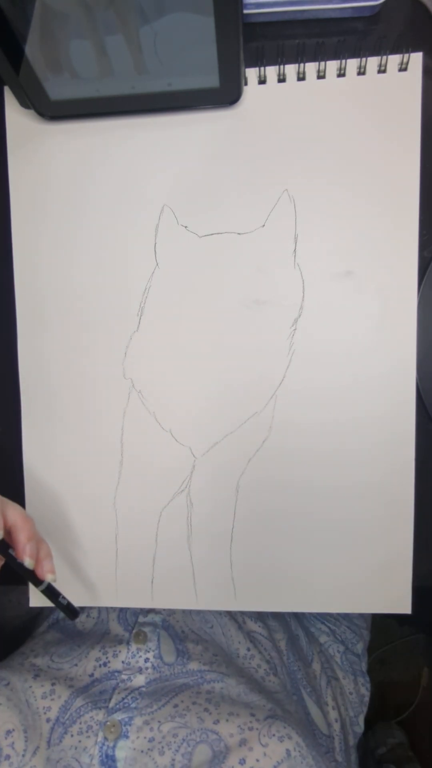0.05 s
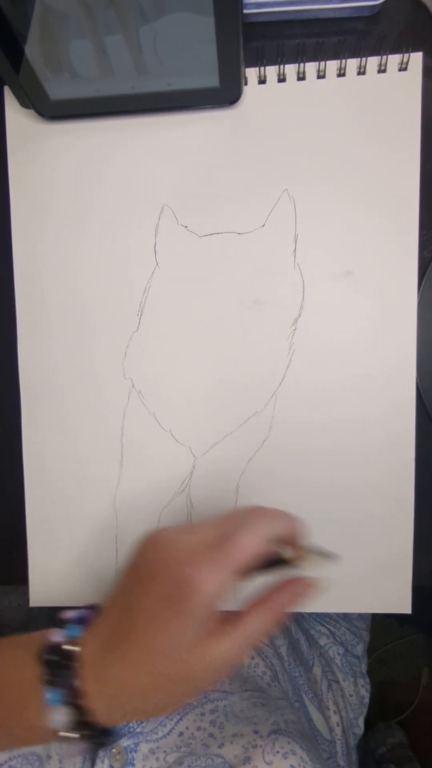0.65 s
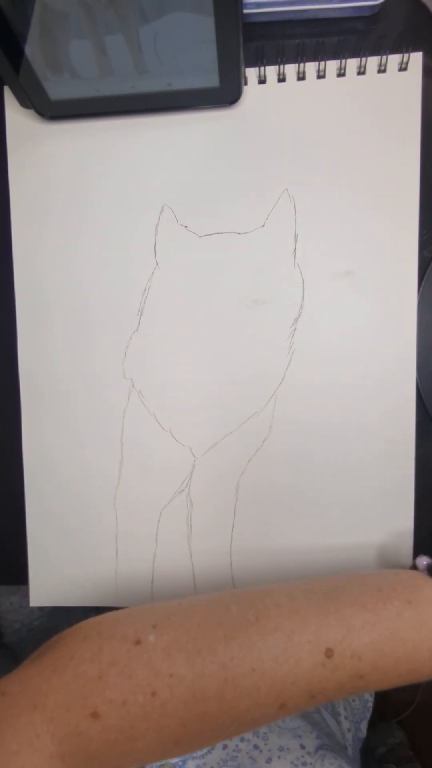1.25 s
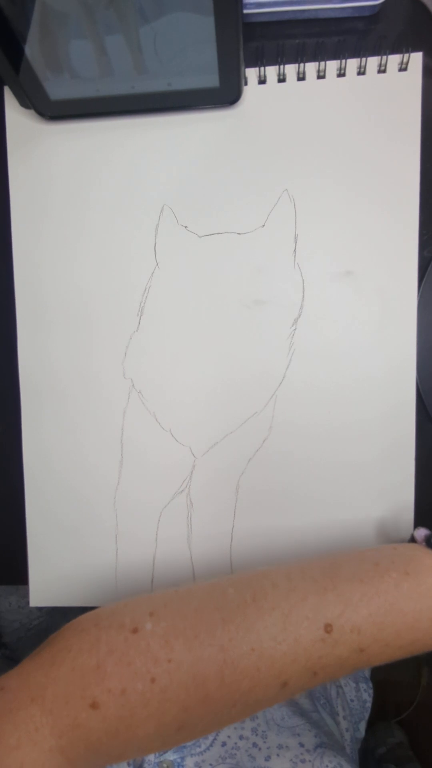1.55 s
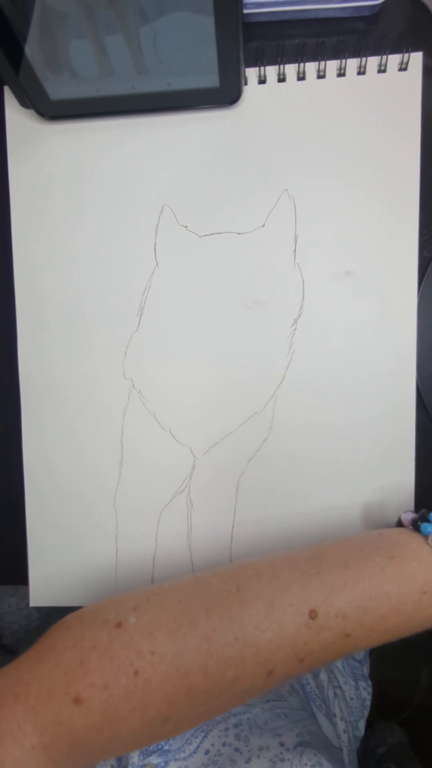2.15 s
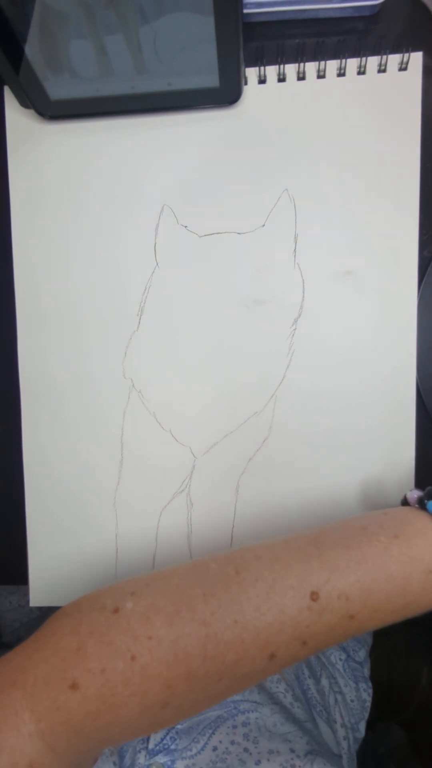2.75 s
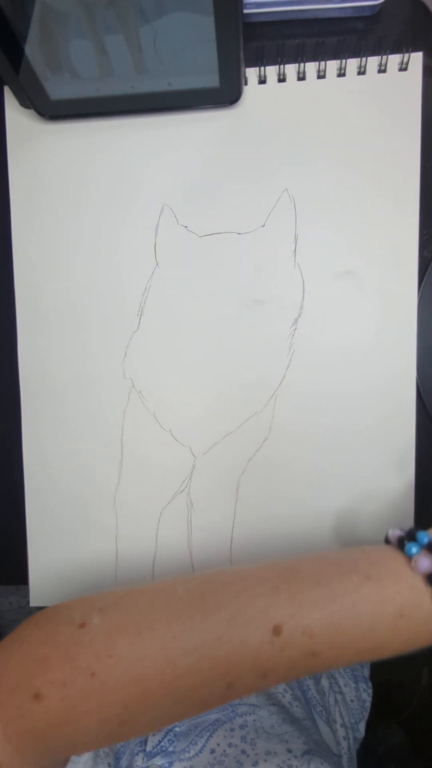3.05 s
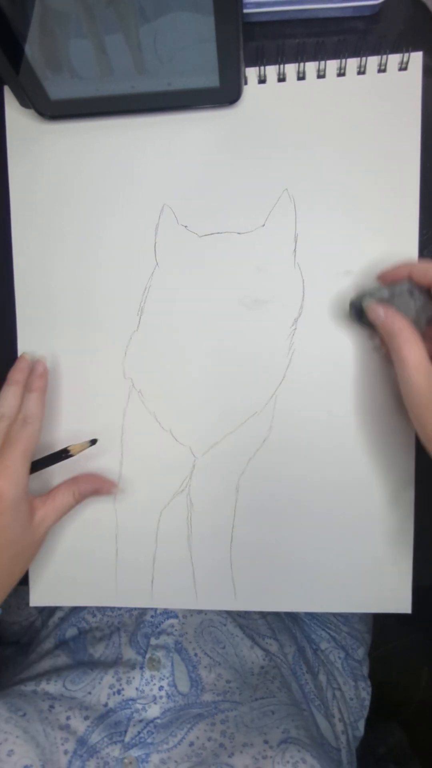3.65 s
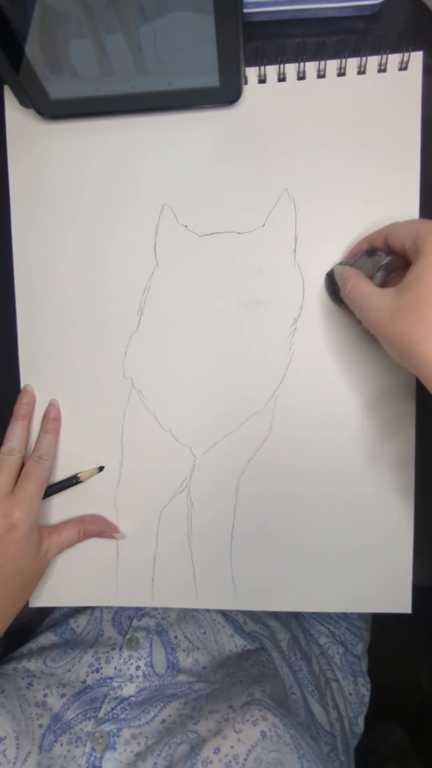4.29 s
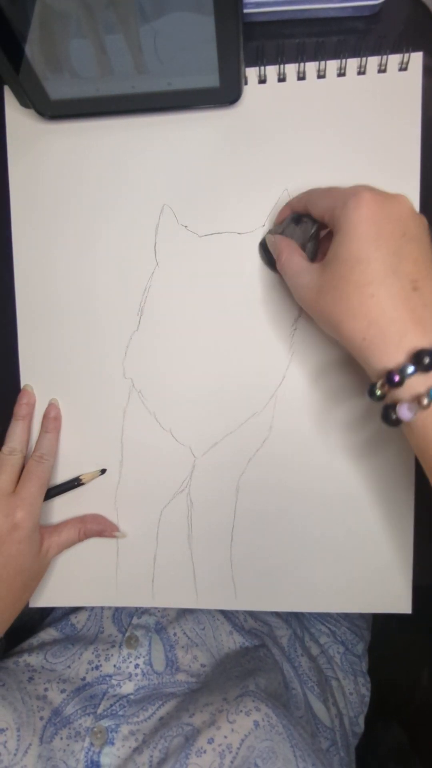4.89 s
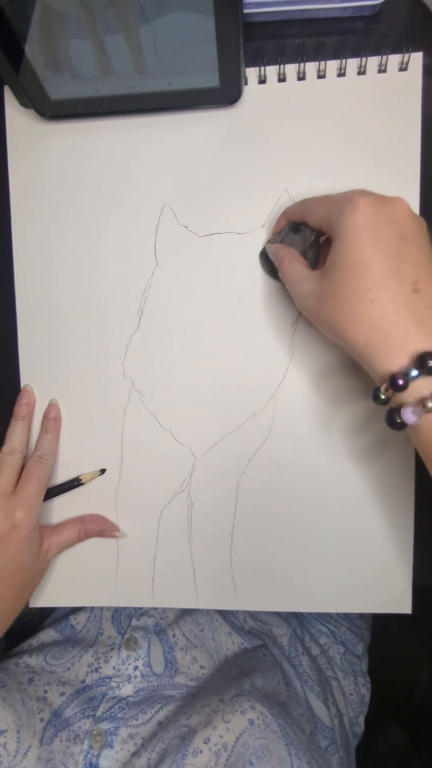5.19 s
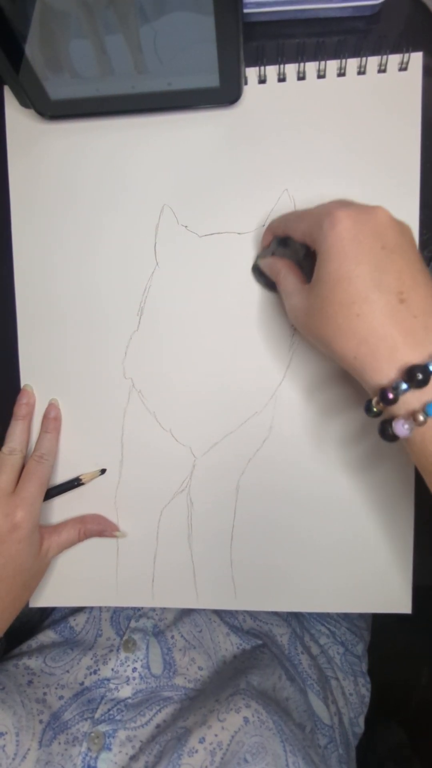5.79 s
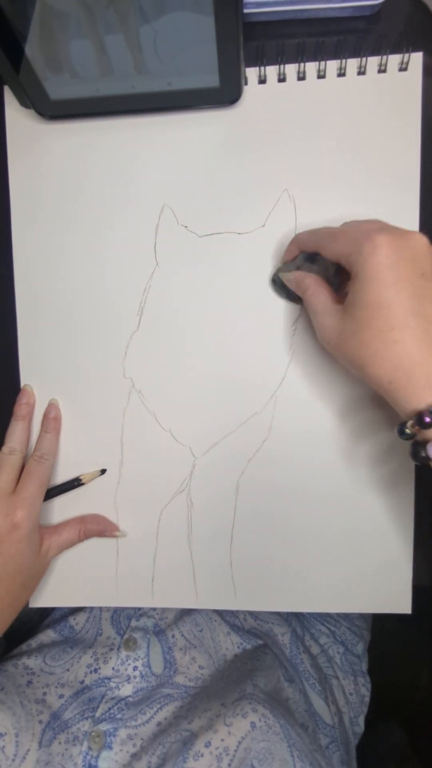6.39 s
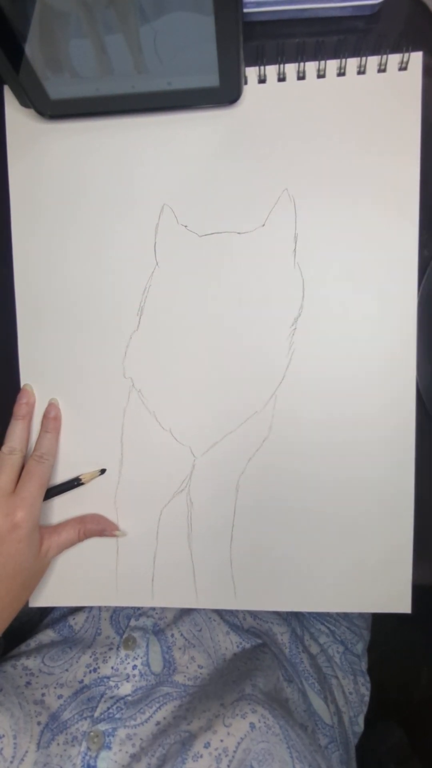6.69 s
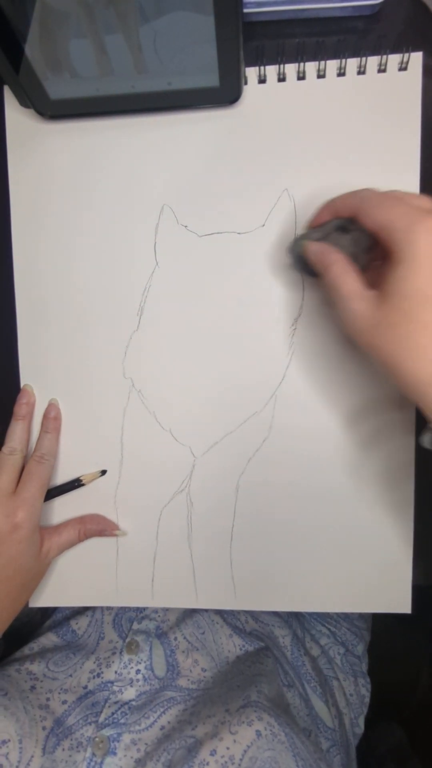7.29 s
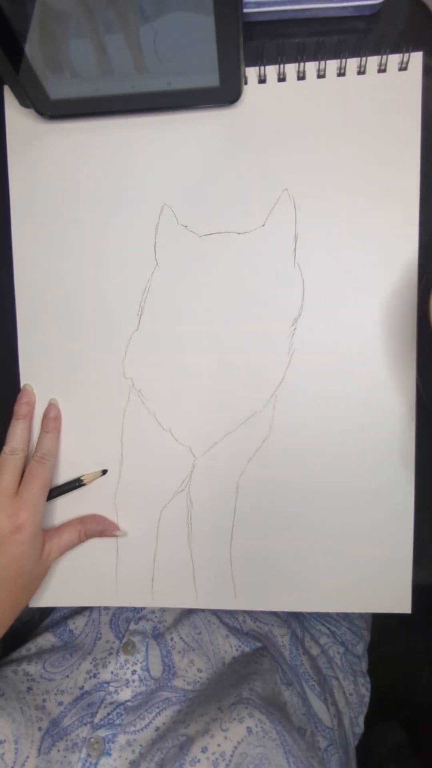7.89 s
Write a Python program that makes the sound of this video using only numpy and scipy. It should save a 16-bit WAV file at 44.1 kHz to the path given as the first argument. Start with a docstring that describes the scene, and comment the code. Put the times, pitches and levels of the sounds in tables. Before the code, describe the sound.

A pencil clatters sharply onto a desk close by. A hand slides and rummages, with scattered light knocks of pencils, a brief hollow rattle of a case and a small hard clink. Then an eraser rubs faintly on a sketch pad, first in separate strokes and then quickly back and forth, with soft pats and low desk bumps. One last stroke follows a pause. The small room is quiet, with a faint fan and hum.

```python
"""Pencil and eraser at a desk

A pencil clatters down, a hand rummages, a case rattles and something hard clinks: each impact excites
damped modes. An eraser then rubs a sketch pad by friction, in light strokes and a quick back-and-forth
run that shakes the desk. A fan, mains hum and a distant rush lie underneath, in a small quiet room."""
import sys
import numpy as np
from scipy import signal
from scipy.fft import rfft, irfft, next_fast_len
from scipy.io import wavfile
from scipy.ndimage import uniform_filter1d

SR = 44100
rng = np.random.default_rng(int(sys.argv[2]) if len(sys.argv) > 2 else 0)


def bounce(signal):
    """Save signal as a 16-bit WAV file at the path given by the first command-line argument."""
    frames = np.transpose(np.atleast_2d(signal))
    limited = np.clip(frames, -1, 1)
    pcm = np.round(limited * 32767).astype(np.int16)
    wavfile.write(sys.argv[1], SR, pcm)


N = 354652
TIME = np.arange(N) / SR
RING_SIZE = 14400   # samples in which an impact dies away


def from_db(db):
    """Amplitude ratio of a level in decibels."""
    return 10 ** (np.asarray(db) / 20)


def unit_rms(x):
    """Normalisation to an rms of 1."""
    return x / np.sqrt(np.mean(x ** 2) + 1e-20)


def at_hz(points, hz):
    """Interpolation on a logarithmic frequency axis."""
    f, value = np.transpose(points)
    return np.interp(np.log(hz + 1), np.log(f), value)


def add(out, s, sound):
    """Superposition of a sound from time s on."""
    start = max(round(s * SR), 0)
    out[..., start:start + sound.shape[-1]] += sound[..., :N - start]


def panned(x, pan_db):
    """Interaural level difference: the left exceeds the right by pan_db."""
    return x * from_db(np.array([[.5], [-.5]]) * pan_db)


def drift(rate):
    """Random modulation: Gaussian values, rate of them a second, joined by straight lines."""
    return np.interp(TIME * rate, np.arange(4096), rng.standard_normal(4096))


# likeness of the sound at the two ears: f/Hz, correlation
COHERENCE = [(60, 0.94), (200, 1), (380, 0.86), (700, .5), (1300, .05), (3000, -.05), (15000, 0)]
def coloured(source, spectrum, resonances=()):
    """Spectral shaping of two white signals into stereo of rms 1, coherent at long wavelengths."""
    size = next_fast_len(source.shape[-1])
    hz = np.arange(size // 2 + 1) * SR / size
    peaks_db = sum(db / (1 + ((hz - f) / width) ** 2) for f, width, db in resonances)
    mid, side = rfft(source, size) * from_db(at_hz(spectrum, hz) + peaks_db) * (hz > 20)
    alike = np.clip(at_hz(COHERENCE, hz), -1, 1)
    both = np.sqrt(1 + alike) * mid + np.sqrt(1 - alike) * side * [[1], [-1]]
    return unit_rms(irfft(both, size)[:, :source.shape[-1]])


def noise(spectrum, resonances=(), size=N):
    """Gaussian stereo noise with a given spectral envelope."""
    return coloured(rng.standard_normal((2, size)), spectrum, resonances)


def slips(per_s, spread_db):
    """Friction as shot noise: tiny random slips of uneven size, per_s of them a second."""
    sizes = from_db(spread_db * np.minimum(rng.exponential(1, N), 4))
    return unit_rms((rng.random(N) < per_s / SR) * sizes * rng.standard_normal((2, N)))


def impact(spectrum, t60, room_db, room_t60):
    """Overlapping damped modes act as decaying noise; the room's reverberation adds in power."""
    t = TIME[:RING_SIZE]
    direct = from_db(-60 * t / t60) * (1 - np.exp(-t / 0.0005))
    room = from_db(room_db - 60 * t / room_t60) * (1 - np.exp(-t / 0.0038))
    return noise(spectrum, size=RING_SIZE) * np.hypot(direct, room)


def ring(modes, uneven_db):
    """Free vibration: damped sinusoids of random strength, the high ones out of phase between the ears."""
    hz, db, t60 = np.transpose(modes)[..., None]
    t = TIME[:RING_SIZE]
    strength = from_db(db + uneven_db * rng.standard_normal(hz.shape)) * rng.choice([-1, 1], hz.shape)
    lead = np.arccos(np.clip(at_hz(COHERENCE, hz), -1, 1)) / 2 * rng.choice([-1, 1], hz.shape)
    fading = strength * np.exp(-np.log(1000) * t / t60)
    return np.array([np.sum(fading * np.sin(2 * np.pi * hz * t + ear * lead), axis=0) for ear in (1, -1)])


# spectrum of the fan: f/Hz, level/dB
FAN_SPECTRUM = [(40, -4), (140, 11), (200, 1.5), (290, -1.5), (390, -0.5), (560, -3.5), (700, -8.5),
                (1050, -11.5), (2100, -15.5), (4000, -25), (6300, -26), (8400, -25.5), (9800, -34),
                (12000, -30.5), (16000, -43.5)]
# its peaks and dips: f/Hz, half width/Hz, level/dB
FAN_PEAKS = [(1331.6, 89, 16), (1540, 25, -9), (1838, 90, 18), (2080, 140, -6)]
def fan():
    """Steady broadband noise, coloured by two airy resonances."""
    return from_db(-69) * noise(FAN_SPECTRUM, FAN_PEAKS)


# harmonics of the mains: f/Hz, level/dB
HUM_HARMONICS = [(60, -76.5), (120, -64)]
def mains_hum():
    """A fundamental and its octave, each with slight random phase modulation."""
    return sum(from_db(db) * np.sqrt(2) * np.sin(2 * np.pi * hz * TIME + 0.067 * drift(10))
               for hz, db in HUM_HARMONICS)


# spectrum of the distant rush: f/Hz, level/dB
RUSH_SPECTRUM = [(120, -8.5), (260, -4), (390, 0.5), (600, -2.5), (1000, -4.5), (1800, -9.5), (3000, -13.5),
                 (4500, -17.5), (8000, -24), (11000, -36), (16000, -50.5)]
# its peaks and dips: f/Hz, half width/Hz, level/dB
RUSH_PEAKS = [(393, 28, 9), (585, 15, 6.5), (3200, 430, 2), (4350, 110, -5), (4900, 140, 4),
              (5750, 150, -4), (6400, 250, 4)]
def distant_rush():
    """Soft resonant noise whose level sinks slowly, then drops away near the end."""
    sag_db_per_s, stop_s, fade_s = 0.29, 6.548, 0.29
    stopped = np.clip((TIME - stop_s) / fade_s, 0, 1)
    level_db = -68 - sag_db_per_s * TIME - 13 * stopped
    return noise(RUSH_SPECTRUM, RUSH_PEAKS) * from_db(level_db + .6 * drift(18))


# low resonance of the desk: f/Hz, level/dB
DESK_SPECTRUM = [(20, -49.5), (30, -26.5), (39, -12.5), (52, -1.5), (66, 1.5), (90, -11.5), (130, -12),
                 (200, -27), (400, -43), (1000, -65)]
def desk_rumble():
    """Faint, continuous random vibration around the desk's low resonance."""
    return noise(DESK_SPECTRUM) * from_db(-65.5 + 1.5 * drift(2.3))


def swell(s, db, rise_s, fall_s):
    """Envelope of one sweep: exponential growth up to time s, then exponential decay."""
    below_peak_db = 20 * np.maximum((s - TIME) / rise_s, (TIME - s) / fall_s).clip(max=10)
    return from_db(db - below_peak_db)


# sweeps of the hand: peak t/s, level/dB, 20 dB rise/s, 20 dB fall/s (a negative pair swaps roles)
HAND_SLIDES = [(.02, -66, -1, -0.4), (.39, -57, 0.18, 0.33), (.75, -67, 0.4, .26), (1.25, -66, 0.05, 0.7),
               (1.63, -56.5, 0.4, 0.2), (2.21, -61.5, .12, 0.22), (2.83, -50.5, .17, 0.24),
               (3.525, -56.5, 0.08, 0.16)]
# spectrum of sliding on the desk: f/Hz, level/dB
SWISH_SPECTRUM = [(150, -11), (400, 2.5), (1200, 4), (2500, -0.5), (4500, -8.5), (8500, -15.5),
                  (15000, -26)]
def sliding_hand():
    """Sliding friction of skin and pencils on the desk: a grainy swish, a faint rustle between sweeps."""
    fidget_end_s = 3.6
    fidget = from_db(-81.5) * np.clip((fidget_end_s - TIME) / 0.18, 0, 1)
    motion = np.max([fidget] + [swell(*slide) for slide in HAND_SLIDES], axis=0)
    swish = coloured(slips(5400, spread_db=2.5), SWISH_SPECTRUM)
    return swish * motion * from_db(2.8 * drift(70))


# hollow body of a knock: f/Hz, level/dB
BODY_SPECTRUM = [(60, -23.5), (125, -4.5), (170, -19.5), (230, -26), (290, -7), (380, -8.5), (520, -3.5),
                 (800, -3), (1100, -7.5), (1600, -19.5), (3000, -50.5)]
# modes of the desk top: f/Hz, level/dB, T60/s
DESK_TOP_MODES = [(291, 2, 0.092), (426, -6, 0.24), (535, -1, 0.48), (635, -0.5, 0.23), (761, -2, 0.083),
                  (770, -3.5, 0.083), (964, -1.5, 0.37), (1170, -7.5, 0.036)]
# wooden clack: f/Hz, level/dB
CLACK_SPECTRUM = [(500, -35.5), (1100, -7), (1600, 1), (2000, -3.5), (2500, -0.5), (3050, -3.5),
                  (3700, -6.5), (4600, -15), (7000, -43)]
# bright snap of contact: f/Hz, level/dB
SNAP_SPECTRUM = [(2500, -31.5), (4500, -4), (6300, -0.5), (7100, -4.5), (8400, 0), (10000, -10),
                 (13000, -12.5), (16000, -16)]
# bending modes of a pencil: f/Hz, level/dB, T60/s
BENDING_MODES = [(1639, -13, .09), (1760, -14, 0.07), (2820, -2.5, 0.076), (2940, -1.5, 0.041),
                 (3000, -0.5, 0.057), (3191, -3.5, 0.085), (3418, -9, 0.049)]
def knock(level_db, body_db, snap_db, ring_db):
    """An impact excites damped modes; a gentler contact lasts longer and so carries less treble."""
    body = impact(BODY_SPECTRUM, t60=.05, room_db=-13, room_t60=.3)
    body += from_db(-19) * ring(DESK_TOP_MODES, uneven_db=2.0)
    clack = impact(CLACK_SPECTRUM, t60=.024, room_db=-16, room_t60=.26)
    tilt_db_per_octave = 0.64 * min(level_db + 12, 0)
    dulled = [(hz, db + tilt_db_per_octave * max(np.log2(hz / 7800), 0)) for hz, db in SNAP_SPECTRUM]
    snap = panned(impact(dulled, t60=0.014, room_db=-17.5, room_t60=0.2), pan_db=3.5)
    tuning = 2 ** (0.018 * rng.standard_normal())   # no two pencils ring at quite the same pitch
    ping = ring([(hz * tuning, db, t60) for hz, db, t60 in BENDING_MODES], uneven_db=0.0)
    return from_db(level_db) * (from_db(body_db) * body + from_db(-9) * clack
                                + from_db(snap_db + 5.5) * snap + from_db(ring_db - 2.0) * ping)


# knocks on the desk: pencils clattering, and last the sharp contact of the small clinking object:
# t/s, level/dB, body/dB, snap/dB, ring/dB
DESK_KNOCKS = [(0.028, -36, -1, -20, -25), (0.232, -44.5, -12.5, -25, -15), (0.249, -47.5, -13.5, -17, -16),
               (0.404, -26, -22, -28, -21.5), (0.428, -21.5, -17.5, -18, -21),
               (0.44, -5.5, -18, -21, -16.5), (0.445, -10.5, -5.5, -12, -15), (0.454, -16.5, -13, -16, -13),
               (0.478, -13.5, -9.5, -16, -12), (0.486, -7.5, -14, -8, -20), (0.508, -17.5, -11.5, -18, -17),
               (0.603, -33.5, -7.5, -14, -15.5), (0.973, -43.5, -13.5, -26, -14),
               (1.136, -51.5, -3, -18.5, -10.5), (1.172, -29, -13.5, -22.5, -12),
               (1.226, -41.5, -17.5, -19.5, -12), (1.241, -41, -28, -35, -5), (1.369, -34, -14, -13, -20),
               (1.374, -25.5, -8, -21, -15), (1.433, -45, -7.5, -32, -26), (1.483, -31.5, -20, -24.5, -32),
               (1.582, -31, -9, -22, -13), (1.594, -35, -10, -15, -6), (1.609, -28.5, -9, -16.5, -13),
               (2.036, -29.5, -7.5, -30, -25), (2.051, -32.5, -5, -34, -22),
               (2.11, -23.5, -17, -35.5, -12.5), (2.153, -33, -12.5, -24, -18),
               (2.198, -42, -3.5, -15.5, -26), (2.412, -46.5, -9, -32, -30), (2.613, -41.5, -9, -34.5, -20),
               (3.117, -48.5, -8.5, -33.5, -15.5), (3.511, -34, -30, -18, -22),
               (3.838, -33, -19, -7.5, -14)]
def desk_knocks():
    """Double impact: one end of an object lands, then the other with a softer, hollower bump."""
    rebound_s, rebound_db = .016, -13
    out = np.zeros((2, N))
    for s, level_db, body_db, snap_db, ring_db in DESK_KNOCKS:
        add(out, s, knock(level_db, body_db, snap_db, ring_db))
        bump = from_db(body_db + 4) * impact(BODY_SPECTRUM, t60=.04, room_db=-15, room_t60=.28)
        clack = from_db(-8) * impact(CLACK_SPECTRUM, t60=.024, room_db=-16, room_t60=.26)
        add(out, s + rebound_s * rng.uniform(.8, 1.2), from_db(level_db + rebound_db) * (bump + clack))
    return panned(out, pan_db=-1.5)


# the hand leaning on the desk: peak t/s, level/dB, half width/s
HAND_SHOVES = [(.53, -51, 0.05), (2.98, -53.5, 0.072), (4.01, -54, 0.015), (6.055, -40, 0.03),
               (6.47, -50.5, 0.033), (7.633, -45.5, 0.025)]
def desk_shake():
    """Forced vibration: each shove of the hand and each eraser stroke drives the desk's low resonance."""
    rumble = noise(DESK_SPECTRUM)
    running_rms = np.sqrt(uniform_filter1d(np.mean(rumble ** 2, axis=0), size=1500) + 1e-6)
    rocks = [(start + length / 2, db + 11, 0.261 * length) for start, length, db in ERASER_STROKES]
    push = sum(from_db(db) * np.exp(-.5 * ((TIME - s) / half_width) ** 2)
               for s, db, half_width in list(HAND_SHOVES) + rocks)
    return rumble / running_rms * push * from_db(-1.5)


# the forearm crossing the sheet: peak t/s, level/dB, 20 dB rise/s, 20 dB fall/s
ARM_BRUSHES = [(.83, -71, .42, .25), (3.46, -83, .3, .1)]
# hiss of the sheet: f/Hz, level/dB
SHEET_SPECTRUM = [(1500, -12), (3200, 2), (5000, -1), (8500, -1), (14000, -1.5), (16000, -5)]
def brushing_arm():
    """Light friction of the arm on paper gives a fine hiss that swells and fades."""
    return noise(SHEET_SPECTRUM) * sum(swell(*brush) for brush in ARM_BRUSHES)


# rattles of a light hollow case being handled: t/s, level/dB
CASE_RATTLES = [(2.843, -35.5), (2.854, -25), (2.856, -27.5), (2.862, -29), (2.87, -34), (2.878, -33.5)]
# clack of its walls: f/Hz, level/dB
CASE_SPECTRUM = [(130, -10), (220, -8), (330, -7.5), (550, 0), (800, -1.5), (1100, 2), (1600, 0), (2500, 1),
                 (3200, -5), (4500, -15.5), (6500, -20), (9500, -21.5), (10500, -23.5), (12000, -28),
                 (15500, -29)]
# its lightly damped modes: f/Hz, level/dB, T60/s
WALL_MODES = [(2484, -13, .4), (6300, -25, 0.17), (10220, -20, 0.11)]
def case():
    """Struck thin walls give dull clacks; the few modes with little damping ring on as clear notes."""
    out = np.zeros((2, N))
    for s, db in CASE_RATTLES:
        clack = impact(CASE_SPECTRUM, t60=0.086, room_db=-14.0, room_t60=0.31)
        notes = from_db(-4.0) * ring(WALL_MODES, uneven_db=0.5)
        add(out, s, from_db(db) * (clack + notes))
    return panned(out, pan_db=0.7)


# bounces of a small hard object: t/s, level/dB
BOUNCES = [(3.8361, -32.5), (3.841, -31.5), (3.845, -38), (3.8478, -31), (3.914, -52.5), (3.964, -60.5)]
# its modes: f/Hz, level/dB, T60/s
OBJECT_MODES = [(245, -26, .18), (600, -22, 0.052), (925, -24.5, 0.091), (2075, -9.5, 0.041),
                (2287.5, -1, 0.058), (2639.5, 1, 0.053), (2850, 1, 0.021), (4214, -12.5, 0.04),
                (4700, -21.5, 0.023), (5030, -8.5, 0.03), (5337, -12.5, 0.039), (6640, -12, 0.035)]
def clinks():
    """Every bounce excites the same well damped modes; reverberation prolongs the ring."""
    out = np.zeros((2, N))
    for s, db in BOUNCES:
        add(out, s, from_db(db) * ring(OBJECT_MODES, uneven_db=3.5))
    room_t60 = 0.26
    room = rng.standard_normal((2, RING_SIZE)) * from_db(-60 * TIME[:RING_SIZE] / room_t60)
    wet = signal.fftconvolve(out, unit_rms(room) / np.sqrt(RING_SIZE), axes=1)[:, :N]
    return panned(out + 0.54 * wet, pan_db=2.0)


# strokes of the eraser: start t/s, duration/s, level/dB
ERASER_STROKES = [(3.957, .11, -64), (4.092, .13, -68), (4.27, 0.084, -67.5), (4.373, 0.0695, -73.5),
                  (4.767, .095, -67.5), (4.875, 0.119, -66.5), (5.032, 0.13, -66.5), (5.165, 0.13, -62.5),
                  (5.342, 0.11, -65), (5.468, 0.14, -64), (5.643, .12, -65.5), (5.785, 0.15, -63),
                  (6.074, .14, -64), (6.229, .11, -67), (6.384, .075, -66), (7.582, .12, -65.5)]
# rubber on paper grain: f/Hz, level/dB
RUB_SPECTRUM = [(300, 3), (700, -2), (1500, -1), (2400, -4.5), (3200, 1.5), (4200, -9), (5100, 1),
                (5900, -2.5), (6700, 6.5), (7300, -3), (8400, 3), (10000, -3.5), (11700, 2.5), (14500, -5),
                (16000, 1)]
def eraser():
    """Stick-slip friction of rubber on paper fibres: the faster it moves, the denser and louder the slips."""
    fastest = 0.491   # share of a stroke at which the speed peaks
    speed, level = np.zeros(N), np.zeros(N)
    for start, length, db in ERASER_STROKES:
        progress = (TIME - start) / length
        inside = (progress > 0) & (progress < 1)
        swing = np.sin(np.pi * np.interp(progress[inside], [0, fastest, 1], [0, .5, 1]))
        speed[inside] = swing
        level[inside] = from_db(db) * swing ** 0.98
    rub = coloured(slips(6000 + 12000 * speed, spread_db=2.5), RUB_SPECTRUM)
    flicker = from_db(-0.4 + 1.3 * drift(180))
    return panned(rub * level * flicker, pan_db=1.4)


# the eraser landing on the sheet: t/s, level/dB
ERASER_LANDINGS = [(4.765, -50), (5.045, -48), (5.345, -56), (5.651, -51), (5.987, -48.5), (6.018, -51.5),
                   (7.585, -52)]
# its soft pat: f/Hz, level/dB
PAT_SPECTRUM = [(60, -2), (130, 11.5), (250, 1), (450, -11.5), (700, -2.5), (1300, -17), (3000, -20),
                (8000, -48)]
# hollow note of the pad: f/Hz, level/dB, T60/s
SKETCH_PAD_MODES = [(693.4, -17, .1)]
def eraser_landings():
    """A soft impact excites mainly low frequencies: a hollow pat of the pad, with a tick of the sheet."""
    out = np.zeros((2, N))
    for s, db in ERASER_LANDINGS:
        pat = impact(PAT_SPECTRUM, t60=0.048, room_db=-14, room_t60=0.26)
        note = ring(SKETCH_PAD_MODES, uneven_db=-6.0)
        tick = from_db(-12) * impact(RUB_SPECTRUM, t60=0.033, room_db=-28, room_t60=.15)
        add(out, s, from_db(db) * (pat + note + tick))
    return out


# echoes off nearby surfaces: left delay/s, right delay/s, level/dB
EARLY_REFLECTIONS = [(.0019, 0.0041, -15.5), (.0041, 0.0038, -13), (.0068, 0.0085, -14.5),
                     (0.0134, 0.014, -13)]
def reflected(x):
    """Comb filtering: small surfaces return middle and treble, which interfere with the direct sound."""
    thrown = signal.sosfilt(signal.butter(1, 450, "high", fs=SR, output="sos"), x)
    out = x.copy()
    for left_s, right_s, db in EARLY_REFLECTIONS:
        add(out[0], left_s, from_db(db) * thrown[0])
        add(out[1], right_s, from_db(db) * thrown[1])
    return out


def scene():
    """Superposition of all sources, with their early reflections."""
    background = fan() + mains_hum() + distant_rush() + desk_rumble()
    handling = sliding_hand() + desk_knocks() + desk_shake() + brushing_arm() + case() + clinks()
    return from_db(-0.42) * reflected(background + handling + eraser() + eraser_landings())


def record(dry):
    """Band limiting: the microphone drops the deepest bass, and the top is cut steeply."""
    low_hz, high_hz = 36, 15750
    thinned = signal.sosfilt(signal.butter(6, low_hz, "high", fs=SR, output="sos"), dry)
    return signal.sosfilt(signal.ellip(12, .2, 70, high_hz, fs=SR, output="sos"), thinned)


dry = scene()
out = record(dry)
bounce(out)
```